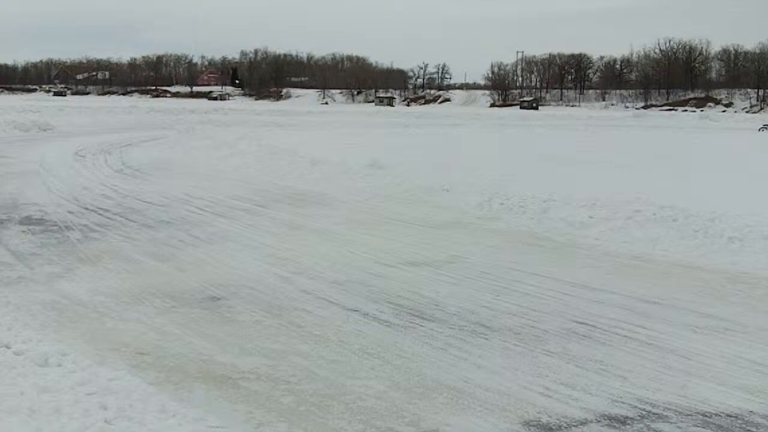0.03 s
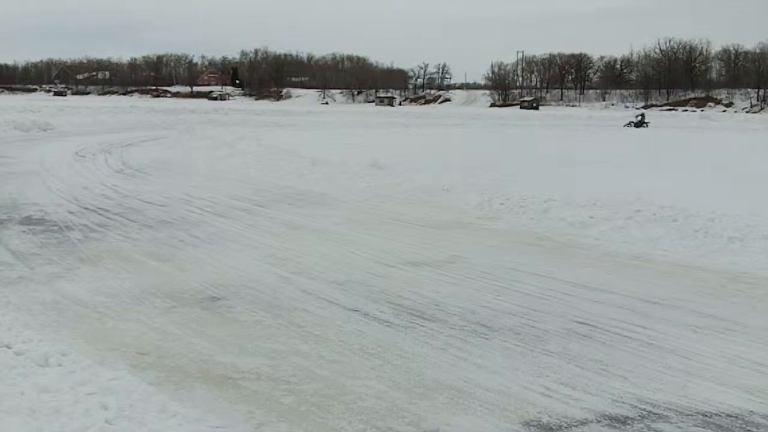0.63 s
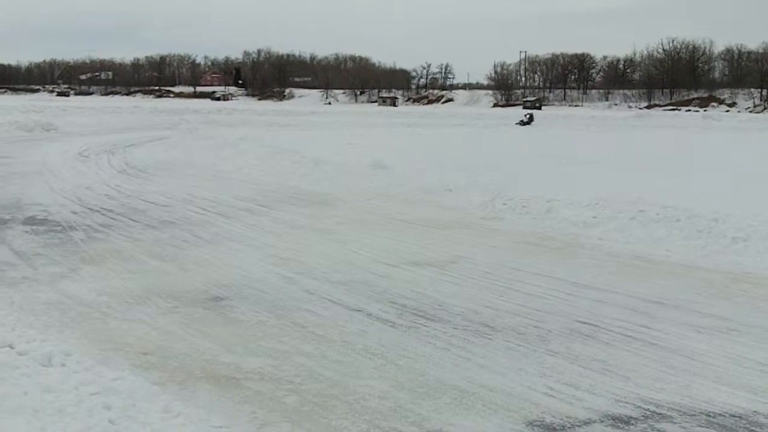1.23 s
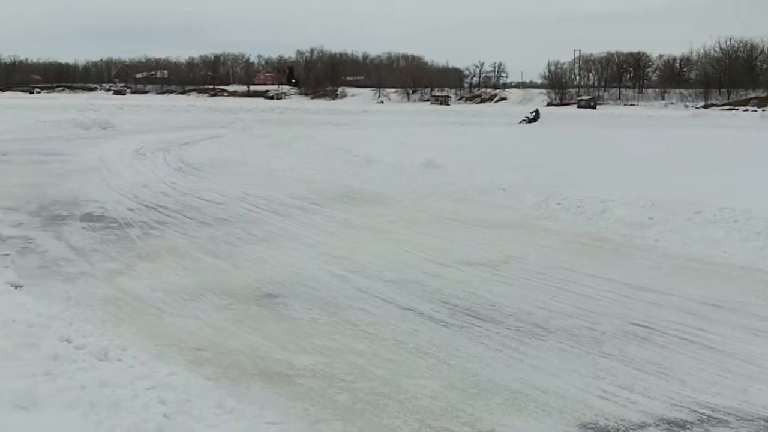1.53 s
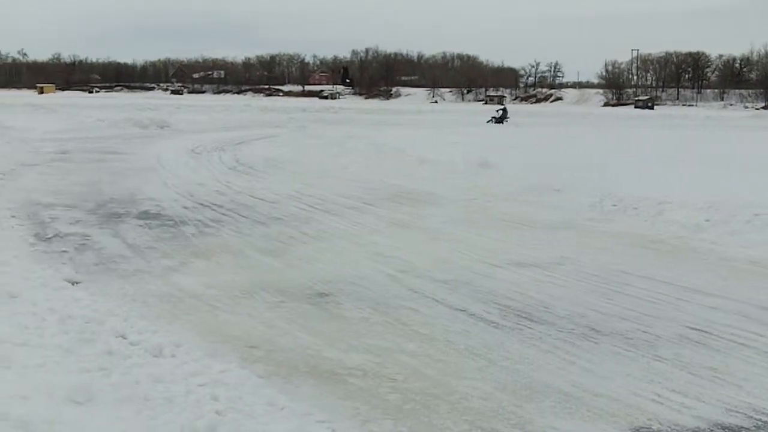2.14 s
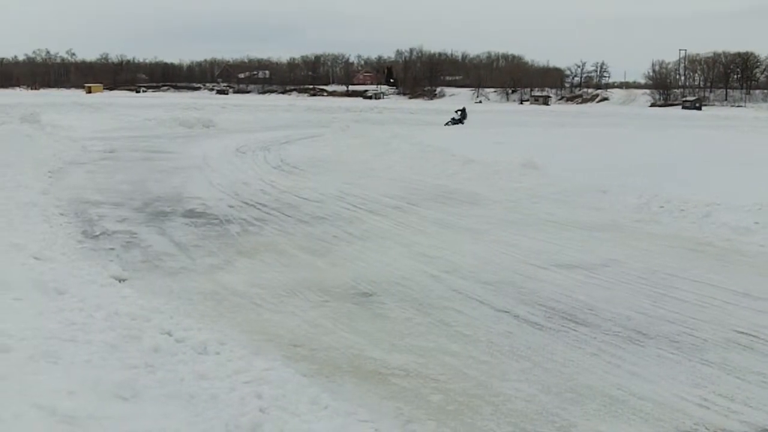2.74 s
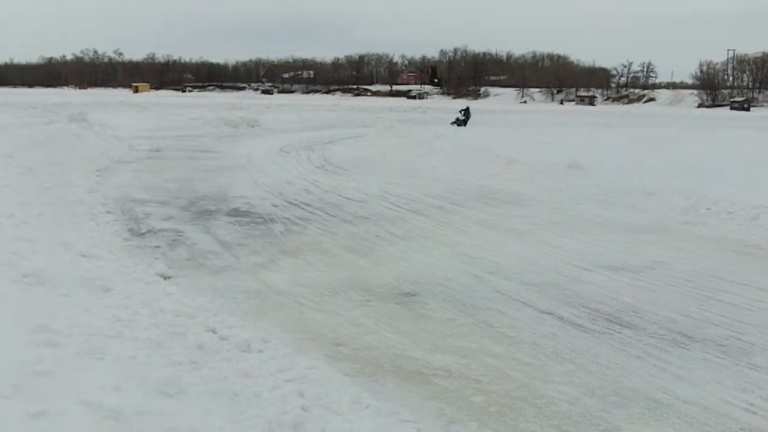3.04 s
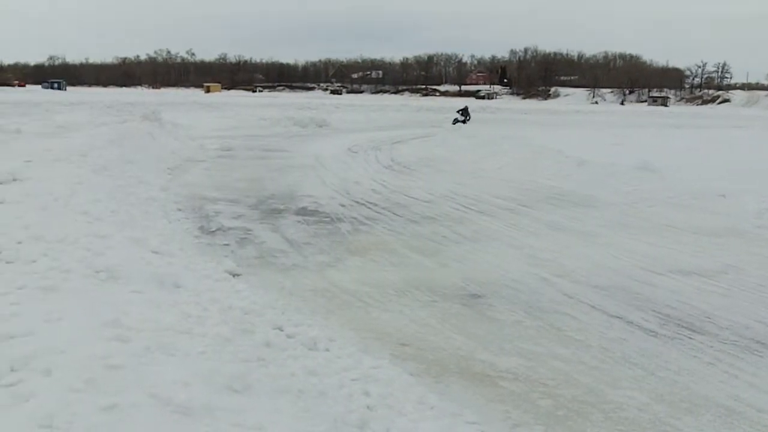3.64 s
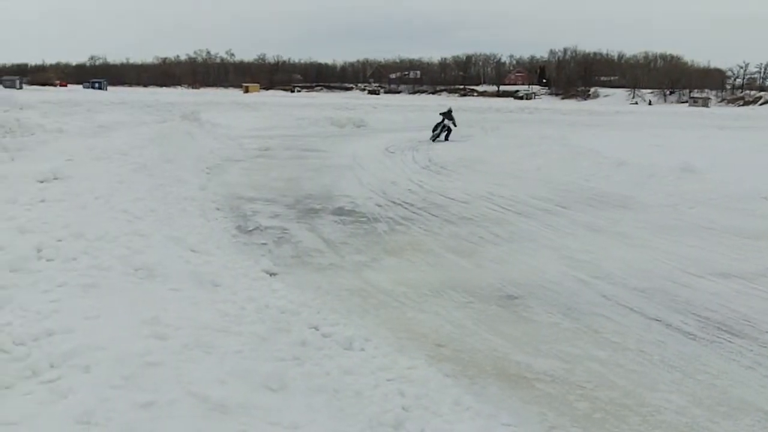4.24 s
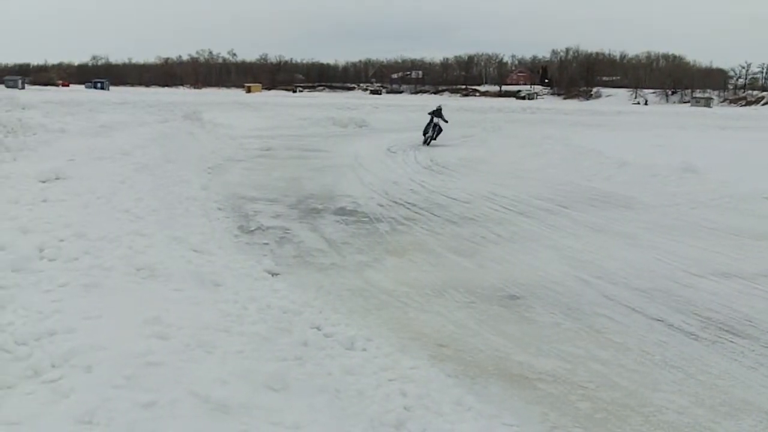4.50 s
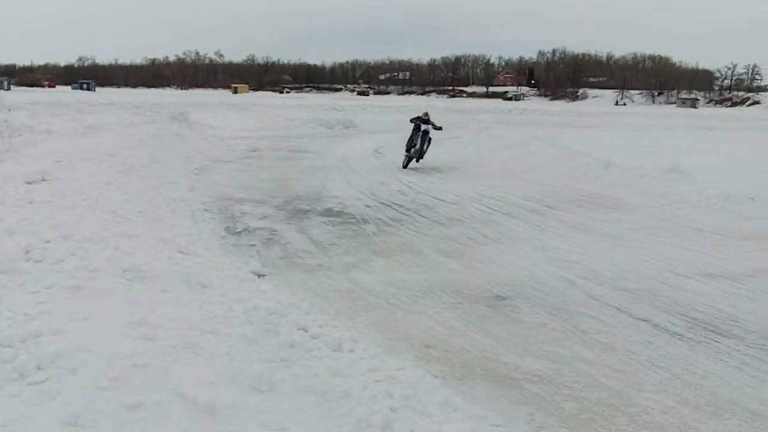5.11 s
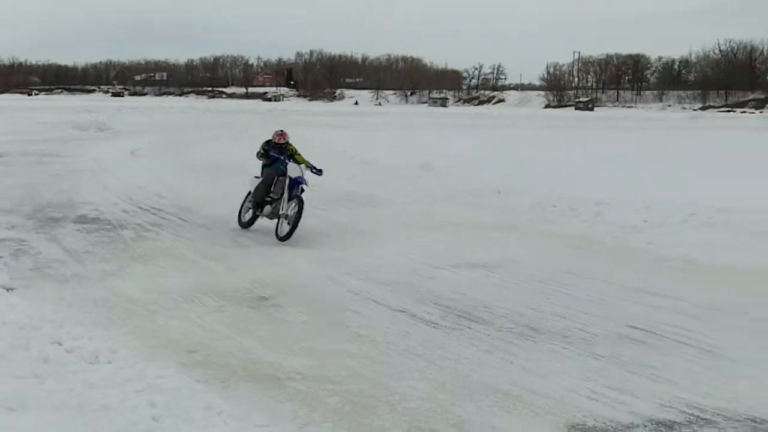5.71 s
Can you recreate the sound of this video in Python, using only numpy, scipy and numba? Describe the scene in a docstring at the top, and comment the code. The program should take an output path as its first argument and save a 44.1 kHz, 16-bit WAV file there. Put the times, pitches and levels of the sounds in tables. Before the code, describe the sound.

A single-cylinder dirt bike rides across an open frozen lake while wind rumbles and flutters on the microphone throughout. For the first two seconds the bike is distant, its exhaust stuttering and barking in uneven bursts. It eases briefly around 2.5 seconds as the pitch climbs. From about 3 seconds the revs are high and the exhaust thins to a buzz with brief whines. Until about 4 seconds, gusts hit the microphone with short, dull pops, and faint dry ticks sound close by. From about 4 seconds the bike comes straight toward the listener; the revs dip, then the throttle opens and the engine swells into a rapid, thumping growl with a rasp behind it. The revs waver around 5 seconds, then rise into a loud, hard, barking roar, closest at the end, just before 6 seconds.

```python
"""A single-cylinder dirt bike on a frozen lake; wind rumbles, flutters and pops on the microphone throughout.
First the bike rounds a far bend, its exhaust stuttering and barking; faint ticks sound close by.
From about 3 s the revs are high and the exhaust thins to a buzz with brief whines.
From about 4 s it comes straight at the listener and opens up: each firing a thump with a rasp behind it."""
import sys
import numpy as np
from scipy import signal
from scipy.fft import rfft, irfft, next_fast_len
from scipy.io import wavfile
from scipy.ndimage import uniform_filter1d, map_coordinates
from numba import njit

SR = 44100
rng = np.random.default_rng(int(sys.argv[2]) if len(sys.argv) > 2 else 0)


def wrap_up_sound(samples):
    """Save the sound to the file named by the first command line argument, as 16-bit audio."""
    columns = np.atleast_2d(samples).T
    # keep every value between -1 and 1, then stretch to whole-number steps
    tamed = np.clip(columns, -1, 1)
    steps = np.round(tamed * 32767).astype(np.int16)
    wavfile.write(sys.argv[1], SR, steps)


N = 258426
TIME = np.arange(N) / SR
SMOOTH_FROM_HZ, SMOOTH_OVER_HZ = 60, 20   # firing rates over which the bangs merge


def motorcycle():
    """Firings drive thump, growl, bark and rasp; all grow with throttle and nearness."""
    # rider's hand: (time [s], throttle [0-1])
    throttle = [(.11,0.65),(.25,1),(.7,1),(1.1,0.21),(1.45,0.58),(1.8,0.76),(2.35,0),(2.9,0.64),(3.23,1),(3.47,0.56),(4.03,0.4),(4.47,0.84),(4.785,0.79),(4.845,1),(5.48,0.82),(5.86,0.32)]
    # round the bend, then straight in: (time [s], distance [m])
    distance = [(0,56.5),(3.0,52),(4.0,46.3),(5.0,31.1),(5.86,19.5)]
    # bass carries best with the bike heading this way: (time [s], gain [dB])
    bass = [(0,-12.5),(2.8,-39),(4.0,-8),(4.22,-12),(4.5,1),(5.05,0),(5.58,2),(5.86,-5)]
    # throttle snapped shut, bark and rasp die: (centre [s], half length [s], depth [dB])
    lift_offs = [(1.034,0.016,7),(1.156,0.017,18),(1.642,.028,8.5),(2.313,0.044,9),(2.663,0.25,8.5),(3.48,0.017,25),(5.611,0.011,6)]
    reference_m, air_loss_db_per_m, growl_loss_db_per_m, blur_db_per_m = 29.1, .73, .45, .17
    rate_hz = firing_rate()
    shut = 1 - np.clip(in_time(throttle)[0], 0, 1)
    distance_m, = in_time(distance)
    beyond_m = np.maximum(distance_m - reference_m, 0)
    full = np.clip((35 - distance_m) / 14, 0, .85)   # inside 35 m the thump fills out, the growl clears
    smooth = np.clip((rate_hz - SMOOTH_FROM_HZ) / SMOOTH_OVER_HZ, 0, 1)
    blur_db = blur_db_per_m * smooth * beyond_m   # far off, bark and rasp give way to the buzz
    lift_db = sum(depth_db * bell(s, half_s) for s, half_s, depth_db in lift_offs)
    run_db, _ = bark_runs()
    bass_db = in_time(bass)[0] - 11 * shut
    bark_db = -42 - lift_db - 9 * shut - 8 * smooth - blur_db + run_db
    rasp_db = -35.5 - lift_db - 20.5 * shut - air_loss_db_per_m * (distance_m - reference_m) - blur_db
    pulses = firings(rate_hz, jitter_s=.00006, uneven_db=.45)
    bangs = firings(rate_hz, jitter_s=.0001, uneven_db=1.34)
    growl = from_db(-33 - 13.5 * full - growl_loss_db_per_m * beyond_m) * growls(pulses, bangs)
    thump = from_db(-26) * thumps(pulses, full)
    bark = from_db(bark_db) * barks(bangs, rate_hz)
    rasp = from_db(rasp_db) * rasps(pulses, bangs, distance_m)
    return (from_db(bass_db) * (thump + growl) + bark + rasp) * reference_m / distance_m


def firing_rate():
    """Engine speed in firings per second, lowered by the share missed at low revs."""
    # revs flare as the rear wheel slips on rutted ice: (time [s], firing rate [Hz])
    revs = [(.1,57),(.36,48),(.52,55.5),(1.4,57),(2.15,61),(2.3,70),(2.9,86.5),(3.0,89.2),(3.15,91.9),(3.19,91.7),(3.235,90.8),(3.29,91.2),(3.36,92.8),(3.5,91.5),(3.65,95.5),(3.72,92.3),(3.84,95),(3.94,92.3),(4.1,79),(4.29,75.5),(4.35,79),(4.42,76.6),(4.55,74.9),(4.68,77.3),(4.745,81),(4.79,73.5),(4.84,82),(4.89,73.5),(4.95,82.5),(5.0,79),(5.05,87),(5.088,81),(5.13,88.5),(5.17,81),(5.22,90.5),(5.268,81.7),(5.31,83.1),(5.346,81.5),(5.46,83.1),(5.572,89.3),(5.624,86.8),(5.68,98.4),(5.732,93.5),(5.78,95.1),(5.824,88.1),(5.86,87.9)]
    rate_hz, = in_time(revs)
    _, missed = bark_runs()
    low_revs = rate_hz < SMOOTH_FROM_HZ + SMOOTH_OVER_HZ / 2
    return rate_hz * (1 - missed * low_revs)


def firings(rate_hz, jitter_s, uneven_db):
    """One impulse per firing, each a little off in time and strength."""
    times_s = TIME[1:][np.diff(np.floor(np.cumsum(rate_hz) / SR)) > 0]
    chance = rng.standard_normal((len(times_s), 2))
    return clicks(times_s + jitter_s * chance[:, 0], from_db(uneven_db * chance[:, 1]))


def thumps(pulses, full):
    """Each firing is a pressure dip that rings in the pipe; close by its mids fill out."""
    # thump spectrum, far: (frequency [Hz], level [dB])
    far_spectrum = [(40,-4.5),(80,-4.5),(155,-3),(235,1.5),(305,-12.5),(380,-3),(460,-13),(600,-10.5),(690,-1.5),(765,-6.5),(850,-39),(1200,-22.5),(4000,-56.5)]
    # thump spectrum, near: (frequency [Hz], level [dB])
    near_spectrum = [(40,-4),(83,-1),(165,3),(250,7),(335,-1),(415,6),(495,4.5),(580,-10),(665,-2.5),(780,-5.5),(900,-17),(1150,-13),(1600,-53),(4000,-76)]
    thump = -(1 - full) * colour(pulses, far_spectrum) - full * colour(pulses, near_spectrum)
    # reflections come and go as the bike moves, so single harmonics waver
    wavering = drift(9) * scattered(thump, decay_s=.006) + drift(14) * scattered(thump, decay_s=.012)
    return thump + from_db(-16) * wavering


def growls(pulses, bangs):
    """The silencer drones between firings, mixed with a hoarse jet; it swells over the ruts."""
    # growl spectrum: (frequency [Hz], level [dB])
    spectrum = [(200,-30),(480,1.5),(660,-1),(780,8.5),(900,2),(1100,1),(1600,-5),(4000,-55.5)]
    # swell over the ruts: (peak [s], half length [s], gain [dB])
    swell = (5.03,.11,5)
    peak_s, half_s, swell_db = swell
    drone = .5 * rms_one(pulses) * (1 + .3 * drift(12)) + .65 * scattered(pulses, decay_s=.006)
    jet = .75 * noise() * puffs(bangs, decay_s=.004)
    return colour(drone + jet, spectrum) * from_db(swell_db * bell(peak_s, half_s))


def barks(bangs, rate_hz):
    """The jet rings in the silencer; at low revs it stutters, with weak puffs between the bangs."""
    # jet spectrum: (frequency [Hz], level [dB])
    spectrum = [(300,-23),(700,4),(1000,5.5),(1400,2),(2050,0),(2500,-6.5),(3500,-10.5),(5000,-15),(7000,-14.5),(9000,-19.5)]
    stutter = np.clip((72 - rate_hz) / 25, 0, 1)
    between = puffs(firings(2 * rate_hz, jitter_s=.002, uneven_db=6), decay_s=.0011)
    blast = puffs(bangs, decay_s=.0011)
    envelope = (blast + .52 * between + .5 - .35 * stutter) * from_db(stutter * drift(25.8))
    jet = colour(steady(noise(), window_s=.00033) * envelope, spectrum)
    bark = ringing(jet, width_hz=520, boost_db=6.5)
    return dulled(bark + from_db(-7.5) * scattered(bark, decay_s=.02), top_hz=7040)


def bark_runs():
    """Hard barking sets in quickly, then sags; returns extra bark in dB and share of firings missed."""
    # runs of barking: (start [s], end [s], initial gain [dB], missed share [0-1])
    runs = [(0.093,0.454,8,0.01),(.26,0.418,1,0.0046),(0.666,.965,6,0.34),(1.719,2.136,6,.335),(5.217,5.9,12,0),(5.573,5.687,9.5,0),(5.698,5.881,6.5,0)]
    edge_s, sag_db_per_s = .024, 3.5
    extra_db, missed = 0, 0
    for start_s, end_s, db, share in runs:
        inside = np.clip(np.minimum(TIME - start_s, end_s - TIME) / edge_s + .5, 0, 1)
        extra_db += inside * (db - sag_db_per_s * (TIME - start_s))
        missed += inside * share
    return extra_db, missed


def ringing(x, width_hz, boost_db):
    """Lift the exhaust's wandering note out of a broad sound; rms 1."""
    # exhaust resonance: (time [s], frequency [Hz])
    note = [(.19,2050),(.25,1700),(.33,1780),(.45,1480),(.56,2100),(.65,2080),(.68,1330),(.82,1330),(.87,2020),(.96,1950),(1.1,1500),(1.3,1500),(1.4,1850),(1.6,1500),(1.74,1930),(2.2,1880),(4.4,1290),(5.55,1300),(5.66,1950)]
    hz = in_time(note)[0] * (1 + .045 * drift(35))
    ring = resonate(x, 2 * np.pi * hz / SR, np.exp(-np.pi * width_hz / SR))
    return rms_one(x + from_db(boost_db) * ring)


def rasps(pulses, bangs, distance_m):
    """A crack at each pulse front, hiss behind it, steady chain and tyre hiss; close by, a rattle."""
    # rasp spectrum: (frequency [Hz], level [dB])
    spectrum = [(600,1),(1500,-8),(3200,-0.5),(4500,-5),(6800,-1.5),(8500,-10),(10500,-15.5),(13000,-29.5),(15500,-46.5)]
    # surge ending the hardest pull: (peak [s], half length [s], level re rasp [dB])
    surge = (5.46,0.091,-3)
    # surge spectrum: (frequency [Hz], level [dB])
    surge_spectrum = [(1500,-13),(2800,-6),(3600,-3.5),(4600,-6.5),(6000,-26),(12000,-44)]
    crack = puffs(pulses, decay_s=.0001)
    hiss = delayed(puffs(bangs, decay_s=.00081), lag_s=.00069)
    close = np.clip((21.5 - distance_m) / 2, 0, 1)   # inside 21.5 m single puffs stand out
    far_power = 1 + .024 * crack ** 2 + .29 * hiss ** 2
    rattle_power = 1.3 * puffs(bangs, decay_s=.0013) ** 2 + .12
    rasp = colour(noise() * np.sqrt((1 - close) * far_power + close * rattle_power), spectrum)
    peak_s, half_s, surge_db = surge
    surge_jet = colour(noise() * np.sqrt(1 + hiss ** 2), surge_spectrum)
    rasp += from_db(surge_db) * bell(peak_s, half_s) * surge_jet
    bright = np.clip(TIME - 3.6, 0, 1)   # treble opens on the approach, 3.6-4.6 s
    return bright * rasp + (1 - bright) * dulled(rasp, top_hz=9500)


def puffs(pulses, decay_s):
    """Gas jet envelope: a quick swell and decay after each pulse; rms 1."""
    pole = np.exp(-1 / (decay_s * SR))
    return rms_one(signal.lfilter([1], [1, -2 * pole, pole * pole], pulses + 1e-18))


def far_buzz():
    """At high revs the crank, two turns per firing, sings a comb of lines; the pipe picks out whines."""
    # buzz swells: (peak [s], level [dB], fade either side [dB/s])
    swells = [(3.229,-53.5,82),(3.7,-66.5,60),(4.55,-58,52)]
    # buzz spectrum: (frequency [Hz], level [dB])
    spectrum = [(700,-14),(1500,-11),(2300,-6),(3100,-3),(4000,-6),(5000,0),(7200,-3.5),(9000,-3.5),(11300,-14),(12500,-25)]
    # pipe whines at held revs: (start [s], end [s], centre [Hz], width [Hz], level [dB], roughness [0-1])
    whines = [(3.075,3.275,3020,330,-64.5,0),(3.1,3.278,2400,800,-68,0.4),(3.19,3.33,3950,500,-67,.3),(3.72,3.925,2050,259,-61,0.32),(4.27,4.47,1710,900,-52.5,0.77)]
    whine_fade_db_per_s = 140
    rate_hz = firing_rate() * (1 + .002 * drift(35))
    level = sum(from_db(db - db_per_s * np.abs(TIME - s)) for s, db, db_per_s in swells)
    crank_rad = 4 * np.pi * np.cumsum(rate_hz) / SR
    lines = harmonics(crank_rad, count=66, uneven_db=6)
    echoes = scattered(firings(rate_hz, jitter_s=.00004, uneven_db=2.5), decay_s=.02)
    buzz = level * colour(lines + .35 * echoes, spectrum)
    for start_s, end_s, hz, width_hz, db, rough in whines:
        band = signal.butter(2, [hz - width_hz / 2, hz + width_hz / 2], "band", fs=SR, output="sos")
        whine = signal.sosfilt(band, (1 - rough) * lines + 2 * rough * echoes)
        outside_s = np.maximum(np.maximum(start_s - TIME, TIME - end_s), 0)
        buzz += from_db(db - whine_fade_db_per_s * outside_s) * steady(rms_one(whine), window_s=.099)
    return buzz


def harmonics(angle_rad, count, uneven_db):
    """Sines of uneven strength, phases scrambled by the long path over the ice; rms 1."""
    gains = from_db(uneven_db * rng.uniform(-.7, 1, count))
    phases_rad = 2 * np.pi * rng.random(count)
    return rms_one(sum(gains[k] * np.sin((k + 1) * angle_rad + phases_rad[k]) for k in range(count)))


def scattered(x, decay_s):
    """Dense dying echoes from snow banks and shore; rms 1."""
    t = TIME[:SR // 2]
    return rms_one(signal.fftconvolve(x, rng.standard_normal(len(t)) * np.exp(-t / decay_s))[:N])


def wind():
    """Breeze and gusts drive slow pressure swells and lumpy flutter; passing eddies add buffets."""
    # steady breeze: (time [s], rumble [dB], flutter [dB])
    breeze = [(0,-22.5,-30),(1.4,-17.5,-38.5),(2.4,-20,-33.5),(3.6,-20,-32.5),(4.3,-25,-34),(4.7,-21,-32),(5.2,-23.5,-32),(5.33,-28,-40.5),(5.86,-22.5,-29)]
    # gusts on top: (peak [s], rumble [dB], flutter [dB], half length [s])
    gusts = [(0.394,-13.5,-32,0.081),(0.674,-14.5,-29,0.093),(0.993,-15.5,-28.5,0.058),(1.143,-32,-25,0.037),(1.412,-16,-30,0.018),(1.81,-16.5,-28,0.16),(2.207,-10.5,-24,0.028),(2.46,-12.5,-28.5,0.027),(2.736,-12,-30,0.015),(3.108,-19.5,-30.5,0.17),(3.449,-16,-17.5,0.0087),(3.71,-17.5,-30,0.056),(3.95,-12.5,-46,0.061),(4.551,-19,-31,0.14),(4.914,-14,-27,0.019),(5.153,-17,-29.5,0.061)]
    # brief lulls: (time [s], depth [dB])
    lulls = [(.54,12.5),(.82,4),(1.31,7.5),(1.487,8),(2.383,14),(2.59,-4),(2.87,4.5),(3.866,13)]
    # passing eddies: (time [s], level [dB], half length [s])
    buffets = [(0.742,-18,0.0041),(1.012,-34,0.013),(1.567,-27.5,0.0032),(1.607,-29,0.0075),(1.889,-22.5,0.011),(2.214,-18,0.007),(2.289,-31,0.027),(2.5,-23.5,0.013),(2.714,-26.5,0.019),(2.807,-35,0.015),(2.934,-29.5,0.012),(3.011,-21,0.0013),(3.085,-23.5,0.014),(3.243,-23.5,0.013),(3.359,-21,0.0077),(3.411,-23.5,0.018),(3.644,-24.5,0.0072),(3.786,-19,0.0096),(3.994,-29,0.016)]
    # rumble, flutter and buffet spectra: (frequency [Hz], level [dB])
    rumble_spectrum = [(4,2.5),(10,6.5),(20,3),(35,-10),(60,-10.5),(110,-25.5),(200,-36.5),(400,-66),(1500,-94.5)]
    flutter_spectrum = [(30,-0.5),(80,2.5),(150,-1),(260,-8),(450,-16),(800,-31),(1500,-38),(12000,-83.5)]
    buffet_spectrum = [(50,9),(130,5.5),(300,1),(550,-4.5),(850,-16.5),(1400,-36),(2500,-42),(6000,-59.5),(14000,-102)]
    rumble_power, flutter_power = from_db(in_time(breeze)) ** 2
    for s, rumble_db, flutter_db, half_s in gusts:
        rumble_power += (from_db(rumble_db) * bell(s, half_s)) ** 2
        flutter_power += (from_db(flutter_db) * bell(s, half_s)) ** 2
    rumble = np.sqrt(rumble_power) * steady(colour(noise(), rumble_spectrum), window_s=.112)
    lumps = colour(noise() * from_db(4.7 * drift(80)), flutter_spectrum)
    flutter = np.sqrt(flutter_power) * steady(lumps, window_s=.12)
    eddies = sum(from_db(db) * bell(s, half_s) for s, db, half_s in buffets)
    turbulence = steady(colour(noise() * from_db(5.8 * drift(300)), buffet_spectrum), window_s=.028)
    lull_db = sum(depth_db * bell(s, half_s=.022) for s, depth_db in lulls)
    return from_db(-lull_db) * (rumble + flutter) + eddies * turbulence


def wind_pops():
    """Eddies burst at the microphone port: pressure builds to a rounded cusp, collapses, recovers."""
    # bursts: (time [s], signed peak [linear], edge [s], build-up [s], undershoot [linear])
    bursts = [(0.381,-0.8,0.0023,0.0015,-0.047),(0.7412,-0.4,0.00024,0.001,0),(1.041,0.091,0.00034,0.00073,0.23),(1.566,-0.034,0.00033,.0007,-0.11),(1.8871,0.29,0.0003,.0008,-0.046),(2.2106,-0.58,0.0002,0.00063,-0.06),(2.2124,0.026,0.00024,.0008,0.43),(2.224,-0.29,0.000091,0.00045,0.037),(2.278,0.25,0.00066,0.0017,0.13),(2.4931,0.29,0.00023,0.00049,0.6),(3.0068,0.22,0.00033,0.00049,0.48),(3.0834,1.2,0.00034,0.00041,.33),(3.243,0.18,0.00035,.001,0.042),(3.355,0.26,0.00037,0.00077,0.076),(3.384,0.19,0.00028,.0006,-0.014),(3.417,0.27,0.0002,.0004,0.23),(3.447,-0.25,0.0017,.0012,0.025),(3.639,0.52,0.00037,0.00088,0.0047),(3.792,0.11,0.00018,0.00034,.16),(3.795,-0.21,0.00028,0.00043,0.049)]
    recover_s = .0096
    pressure = np.zeros(N)
    for s, peak, edge_s, build_s, undershoot in bursts:
        span = np.abs(TIME - s) < .1
        t = TIME[span] - s
        collapsed = .5 + .5 * np.tanh(t / edge_s - 1)
        away_s = np.hypot(t, edge_s) - edge_s
        pressure[span] += peak * (1 - collapsed) * np.exp(-away_s / build_s)
        pressure[span] -= undershoot * collapsed * np.exp(-away_s / recover_s)
    return dulled(dulled(pressure, top_hz=3000), top_hz=3600)


def ticks():
    """Tiny dry clicks close by, alone or in quick uneven runs."""
    # tick runs: (start [s], level [dB], clicks [count])
    runs = [(0.692,-35,2),(.742,-38,1),(.89,-35.5,2),(.966,-40,1),(0.997,-36,3),(1.124,-37,1),(1.223,-38.5,2),(1.396,-43,2),(1.761,-38,2),(1.8,-35,3),(1.92,-34.5,3),(2.134,-36,1),(2.195,-34.5,2),(2.431,-37,1),(2.451,-35,1),(2.493,-35.5,2),(2.639,-35,1),(2.733,-35,2),(2.826,-38,1),(3.453,-37,2),(3.92,-33,4),(4.012,-36,1)]
    gap_s = .007
    impulses = np.zeros(N)
    for s, db, count in runs:
        k = np.arange(round(count))
        times_s = s + k * gap_s * rng.uniform(.8, 1.2, len(k))
        impulses += clicks(times_s, from_db(db - k * rng.uniform(0, 1.7, len(k))))
    return dulled(signal.lfilter([1], [1, -.3], impulses + 1e-18), top_hz=12600)


def air():
    """Faint steady background noise."""
    # background spectrum: (frequency [Hz], level [dB])
    spectrum = [(50,10.5),(300,-16.5),(800,-6),(2000,-33.5),(4000,-34),(9000,-37),(15000,-50)]
    return from_db(-51.5) * colour(noise(), spectrum)


def from_db(db):
    """Decibels to gain."""
    return 10 ** (np.asarray(db) / 20)


def rms_one(x):
    """Scale to unit rms."""
    return x / np.sqrt(np.mean(x ** 2) + 1e-20)


def in_time(rows):
    """Each column of a time curve at every sample."""
    times_s, *columns = np.transpose(rows)
    return [np.interp(TIME, times_s, column) for column in columns]


def bell(centre_s, half_s):
    """Gaussian swell of height 1."""
    return np.exp(-.5 * ((TIME - centre_s) / half_s) ** 2)


def noise():
    """White noise."""
    return rng.standard_normal(N)


def drift(rate_hz):
    """Smooth random wander; rms 1."""
    knots = rng.standard_normal(N // 10)
    return rms_one(map_coordinates(knots, [TIME * rate_hz], order=2))


def clicks(times_s, heights):
    """Single-sample impulses."""
    out = np.zeros(N)
    np.add.at(out, np.clip((np.asarray(times_s) * SR).astype(int), 0, N - 1), heights)
    return out


def delayed(x, lag_s):
    """Fractional delay."""
    return np.interp(TIME - lag_s, TIME, x, left=0)


def steady(x, window_s):
    """Even out the level, so that only an envelope shapes it."""
    power = uniform_filter1d(x ** 2, max(int(window_s * SR), 2))
    return x / np.sqrt(np.maximum(power, 0) + .05)


def colour(x, spectrum):
    """Minimum-phase filter with the given spectral shape; rms 1."""
    size = next_fast_len(N + SR // 2, True) // 2 * 2
    hz, db = np.transpose(spectrum)
    grid_hz = np.maximum(np.arange(size // 2 + 1) * SR / size, 1)
    cepstrum = irfft(np.log(from_db(np.interp(np.log(grid_hz), np.log(hz), db))))
    cepstrum[1:size // 2] *= 2
    cepstrum[size // 2 + 1:] = 0
    return rms_one(irfft(rfft(x, size) * np.exp(rfft(cepstrum)))[:N])


def dulled(x, top_hz):
    """Two-pole low-pass."""
    return signal.sosfilt(signal.butter(2, top_hz, fs=SR, output="sos"), x)


@njit
def resonate(x, step_rad, radius):
    """Two-pole resonance with a moving centre; peak gain 1."""
    y = np.zeros(len(x))
    for i in range(2, len(x)):
        drive = (1 - radius * radius) / 2 * (x[i] - x[i - 2])
        y[i] = drive + 2 * radius * np.cos(step_rad[i]) * y[i - 1] - radius * radius * y[i - 2]
    return y


def scene():
    """Bike, wind and background, alike in both channels."""
    mono = motorcycle() + far_buzz() + wind() + wind_pops() + ticks() + air()
    return np.array([mono, mono])


def record(dry):
    """The microphone has a deep treble notch and opens after a moment; the top is cut."""
    notch_hz, notch_width_hz, cutoff_hz = 5423, 1440, 15600
    start_s, fade_in_s = .11, .0052
    b, a = signal.iirnotch(notch_hz, notch_hz / notch_width_hz, fs=SR)
    opened = np.clip((TIME - start_s) / fade_in_s, 0, 1)
    sound = signal.lfilter(b, a, dry) * opened
    return signal.sosfilt(signal.ellip(10, .1, 80, cutoff_hz, fs=SR, output="sos"), sound)


dry = scene()
out = record(dry)
wrap_up_sound(out)
```